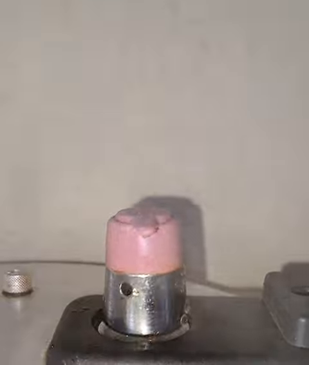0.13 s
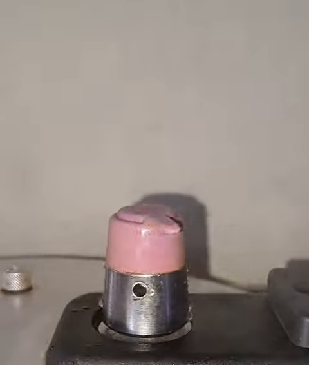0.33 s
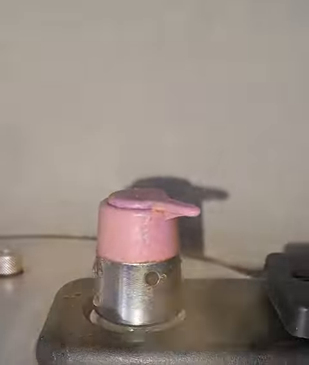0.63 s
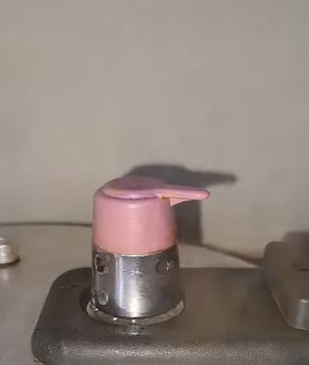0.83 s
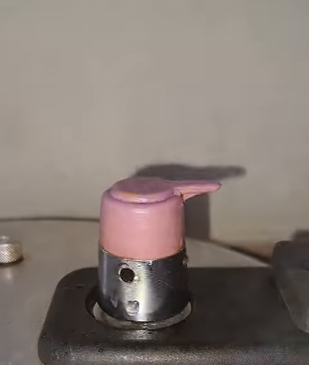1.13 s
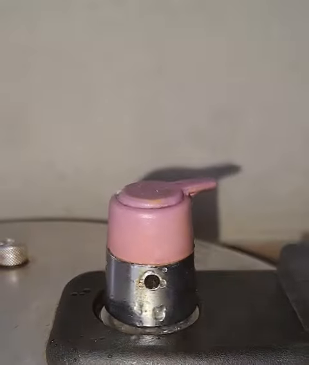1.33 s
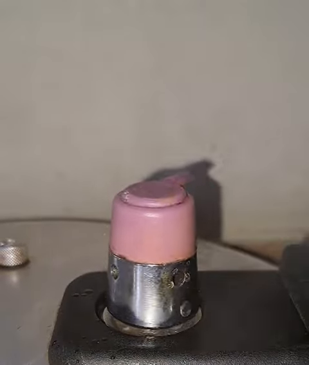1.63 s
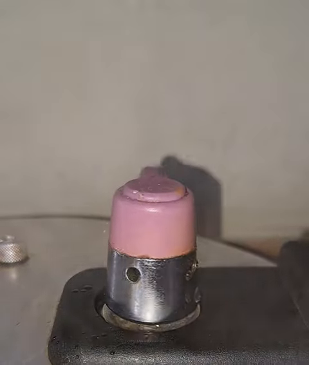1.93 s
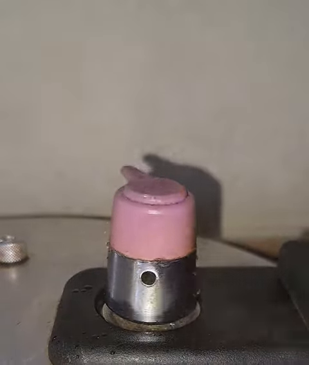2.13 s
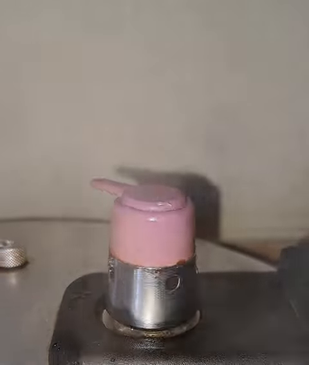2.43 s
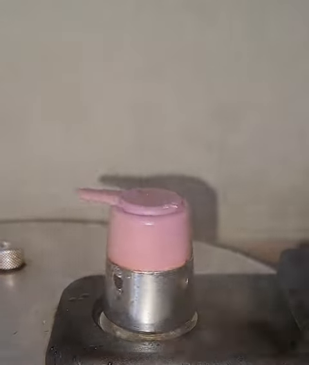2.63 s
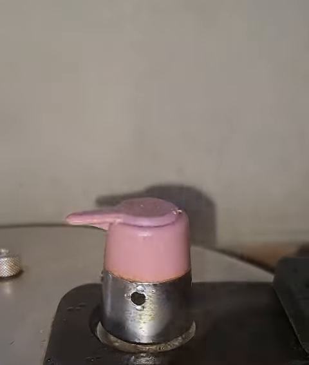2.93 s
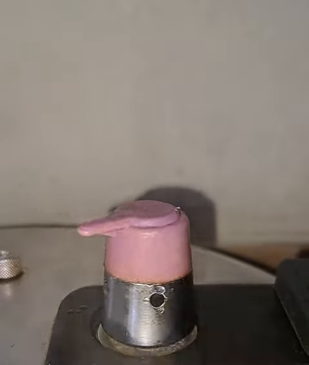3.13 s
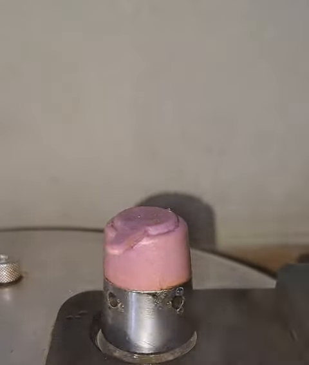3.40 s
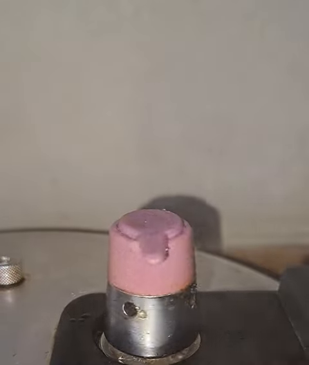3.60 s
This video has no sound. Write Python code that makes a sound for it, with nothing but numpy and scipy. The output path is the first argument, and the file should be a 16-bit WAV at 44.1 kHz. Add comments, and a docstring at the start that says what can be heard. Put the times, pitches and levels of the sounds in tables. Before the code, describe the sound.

Close stereo microphone on a turning pressure cooker weight in a kitchen: sharp steam hiss sputters with water spits and lumpy rumble, then dries into strong, fast chuffing pulses until the end.

```python
"""Steam hisses out of the slowly turning weight valve of a pressure cooker, close to a two-port microphone.
The weight jiggles on its seat about ten times a second: first a wet, sputtering flutter, then clear-cut puffs.
The jet is noise in three bands that follow a table of the valve flow.
Water drops spit in it as short damped sines, and steam buffets the ports as a lumpy low rumble."""
import sys
import numpy as np
from scipy import signal
from scipy.fft import rfft, irfft, next_fast_len
from scipy.io import wavfile
from scipy.ndimage import uniform_filter1d, map_coordinates

SR = 44100
rng = np.random.default_rng(int(sys.argv[2]) if len(sys.argv) > 2 else 0)


def put_to_file(sound):
    """Save the sound as 16-bit audio at rate SR, in the file named by the first command-line argument."""
    columns = np.atleast_2d(sound).T  # one column per channel
    safe = np.clip(columns, -1, 1)
    whole_steps = np.round(safe * 32767)
    wavfile.write(sys.argv[1], SR, whole_steps.astype(np.int16))


N = 165816
T = np.arange(N) / SR  # seconds

START_S = 0.1095  # silence before this
# when the wet sputter starts turning into puffs, and when it has turned: start_s, end_s
CHANGE_S = (1.8, 2.5)
RIGHT_LAG_S = .00016  # the right port hears later by this basic lag


def amp(db):
    """dB to gain."""
    return 10 ** (np.asarray(db) / 20)


def unit(x):
    """Scale to rms 1."""
    return x / np.sqrt(np.mean(x ** 2) + 1e-20)


def along(points, hz):
    """Each column of (Hz, value, ..) rows, read at hz on a log axis."""
    f, *cols = np.transpose(points)
    return np.array([np.interp(np.log(hz + 1), np.log(f + 1), c) for c in cols])


def curves(rows):
    """One value per sample for each column after the time."""
    s, *cols = np.transpose(rows)
    return [np.interp(T, s, c) for c in cols]


def wobble(rate):
    """A smooth random curve, rate knots a second."""
    knots = rng.standard_normal(int(N * rate / SR) + 4)
    return map_coordinates(knots, [T * rate])


def filtered(x, response):
    """x times a response of frequency."""
    m = next_fast_len(N + SR // 2)
    return irfft(rfft(x, m) * response(np.fft.rfftfreq(m, 1 / SR)), m)[..., :N]


def ports(depth_db):
    """Noise with patches of random gain at two ports; the right hears later, and the
    path difference drifts from band to band as the holes turn."""
    # how the ports relate: pitch_hz, likeness (0-1),
    # extra lag of the right port while sputtering: wet_lag_rad, and while puffing: puff_lag_rad
    likeness = [(40, 0.6, 0.13, 0.092), (130, 0.96, 0.37, 0.68), (825, 0.39, -0.42, -0.72),
                (1610, 0.98, 0.71, 0.63), (2440, 0.72, -0.7, -0.64), (3110, 0.38, 0.41, -0.73),
                (3890, 1, 0.46, -0.95), (4580, 0.04, 0.42, 1), (5400, 0.11, 1, 0.85),
                (8400, 0.8, -0.31, -1.26), (11100, 1, -0.79, 1), (15000, 0.2, -0.3, -0.67)]
    drift_rad = 2.5  # rms wander of the phase from 10 kHz up, less below
    hz, s, z = signal.stft(rng.standard_normal((2, N)), SR, nperseg=512)

    def patches(bins, frames):
        """Random values smoothed over frequency bins and time frames, rms 1."""
        grid = uniform_filter1d(rng.standard_normal(z.shape[1:]), size=bins, axis=0)
        return unit(uniform_filter1d(grid, size=frames, axis=1))

    alike, wet_lag, puff_lag = along(likeness, hz)[..., None]
    # shared noise plus opposed noise sets how alike the ports are
    turn = np.arccos(np.clip(alike, 0, 1)) / 2
    mid, side = z[0] * np.cos(turn), z[1] * np.sin(turn)
    puffing = np.interp(s, CHANGE_S, [0, 1])
    phase = 2 * np.pi * hz[:, None] * RIGHT_LAG_S + wet_lag + (puff_lag - wet_lag) * puffing
    phase = phase + drift_rad * np.clip(hz[:, None] / 1e4, 0, 1) ** 2 * patches(12, 150)
    gain = amp(depth_db * patches(4, 12) + 1.86 * patches(1, 30))
    pair = np.array([mid + side, (mid - side) * np.exp(-1j * phase)]) * gain
    return unit(signal.istft(pair, nperseg=512)[1][:, :N])


def buffet():
    """Lumpy low rumble of steam blowing past the ports, a little stronger at the left one."""
    # course of the rumble, before a fixed lift: start_s, level_db
    rumble_level = [(.11, -61), (.2, -57), (.35, -60.5), (.65, -58), (.8, -62), (.97, -57), (1.1, -66),
                    (1.23, -57), (1.36, -59), (1.6, -58), (1.71, -49.5), (1.9, -66.5), (2.0, -51),
                    (2.08, -82), (2.55, -80), (2.64, -66), (2.72, -87), (2.84, -73), (2.95, -84),
                    (3.1, -63), (3.22, -74), (3.76, -70)]
    # relative spectrum of the rumble, before a low-pass at 230 Hz: pitch_hz, level_db (per Hz)
    rumble_colour = [(25, -23), (48, -2.5), (81, -7), (130, 2), (220, -2), (290, -28), (480, -120)]
    level_db, = curves(rumble_level)
    rumble = filtered(ports(depth_db=0.0),
                      lambda hz: amp(along(rumble_colour, hz)) / (1 + (hz / 230) ** 6))
    # lumps common to both ports, and lumps of each port's own
    lumps_db = 5 * wobble(22) + 3 * np.array([wobble(14), wobble(14)])
    lumps = amp(np.minimum(lumps_db, 7))
    return unit(rumble * lumps) * amp(level_db + 3.7) * amp([[.8], [-.8]])  # left and right trim in dB


def drops():
    """Water drops bursting in the jet: short damped blips, mostly while it sputters."""
    # the drops that spit loudest, before a lift of 1 dB and the port gains: start_s, level_db, pitch_hz
    loud_spits = [(0.181, -7.5, 2650), (0.586, -12, 2340), (0.717, -13, 2640), (1.111, -8.5, 2550),
                  (1.206, -18.5, 1330), (1.577, -14.5, 2240), (1.793, -15.5, 2100)]
    drop_density = 130  # scaled by the end of the change; about 177 small drops a second
    middle_hz, faintest_db = 1870, -40  # small drops, level before the port gains
    drop_cycles = 7  # cycles in which a blip decays by 30 dB
    count = int(drop_density * CHANGE_S[1])
    draw = rng.random((count, 3))
    small_s = START_S + draw[:, 0] * (CHANGE_S[0] + .15 - START_S)
    small_db = faintest_db + 8 * draw[:, 1] ** 2
    small_hz = middle_hz * 2 ** (2.6 * (draw[:, 2] - .5))  # 2.6 octaves wide
    small = np.c_[small_s, small_db, small_hz]
    s, db, hz = np.vstack([small, np.array(loud_spits) + [0, 1, 0]]).T[..., None]
    k = np.arange(400)  # samples in a blip
    cycles = hz * k / SR
    envelope = amp(db - 30 * cycles / drop_cycles) * (1 - np.exp(-2 * cycles))
    blips = envelope * np.sin(2 * np.pi * cycles)
    places = np.round(s * SR).astype(int) + k
    x = np.bincount(places.ravel(), blips.ravel(), N + 400)[:N]
    return np.array([x * amp(-1.0), np.roll(x, round(RIGHT_LAG_S * SR)) * amp(0.5)])


def jet():
    """Turbulent steam through the holes of the weight, in three bands that follow the flow."""
    # valve flow, before the band trims: start_s, level_db, treble_db (over that level)
    flow = [(0.118, -30, 5.5), (0.158, -32, 6.5), (0.188, -25.5, 9.5), (0.208, -30, 6.5), (0.281, -29, 7),
            (0.393, -33.5, 6), (0.433, -28, 8.5), (0.467, -32.5, 4.5), (0.503, -27.5, 9), (0.563, -32, 4),
            (0.591, -23.5, 6.5), (0.631, -31, 2), (0.662, -27, 7.5), (0.736, -30.5, 4), (0.77, -26.5, 9.5),
            (0.806, -30.5, 3.5), (0.856, -26, 7.5), (0.898, -27.5, 4.5), (0.942, -26.5, 12), (0.97, -32, 2),
            (0.988, -27.5, 11), (1.05, -29, 9), (1.074, -31, 5), (1.111, -25, 8), (1.147, -28.5, 4),
            (1.215, -24.5, 8.5), (1.233, -26.5, 3.5), (1.317, -28.5, 5.5), (1.345, -30, 2),
            (1.393, -26.5, 5.5), (1.453, -31, 3), (1.485, -25.5, 10), (1.519, -28.5, 2), (1.584, -26, 7),
            (1.616, -27, 1), (1.644, -25.5, 6), (1.664, -27.5, 2), (1.694, -26.5, 11), (1.71, -30, -1),
            (1.746, -28, 6.5), (1.868, -28, 4.5), (1.906, -27.5, 8), (1.95, -28.5, 1.5), (1.97, -26.5, 5.5),
            (2.057, -29.5, 1), (2.081, -28, 3), (2.215, -31.5, 1), (2.261, -27, 2.5), (2.307, -25.5, 0),
            (2.333, -31.5, 0), (2.373, -25.5, 0), (2.415, -26.5, -2.5), (2.451, -37, -2),
            (2.474, -26.5, 4.5), (2.505, -22, 0), (2.532, -33.5, -3), (2.56, -21.5, 4), (2.596, -20.5, 1),
            (2.624, -35, -0.5), (2.644, -25, 4.5), (2.666, -20.5, 2), (2.745, -34, -0.4), (2.776, -24, 5),
            (2.806, -22.5, 0.5), (2.832, -36.5, 3), (2.852, -25, 2.5), (2.885, -21, 3.5), (2.914, -24.5, 3),
            (2.932, -32.0, 2.5), (2.977, -23, 2), (3.051, -31, 3), (3.095, -25, 6), (3.137, -33, 1.5),
            (3.168, -23, 5.5), (3.233, -29.5, 2), (3.259, -25.5, 9.5), (3.299, -29.5, 5),
            (3.366, -30.5, 5.5), (3.44, -25, 4.5), (3.488, -35, 3), (3.522, -24, 7), (3.582, -31, 5),
            (3.646, -26, 9), (3.677, -37.5, 3), (3.714, -24.5, 6.5), (3.753, -32, 5)]
    # low band over the jet level, before the band trims: start_s, level_db
    low_over_jet = [(.1, -9), (.9, -10), (2.0, -9), (2.15, -16), (2.2, -11.5), (2.7, -12), (3, -9.5),
                    (3.76, -9)]
    # relative colour at the ports: pitch_hz, then while the jet sputters left_wet_db, right_wet_db,
    # and once it puffs left_puff_db, right_puff_db
    colour = [(200, -26, -27, -30.5, -31.5), (393, -26, -26, -28, -29), (700, -24, -26.5, -25, -29),
              (850, -21, -29.5, -22, -28), (1060, -25.5, -26.5, -25.5, -24.5),
              (1320, -18.5, -15.5, -24, -17.5), (1980, -20, -26.5, -18, -28.5),
              (2185, -15.5, -18, -21, -14.5), (2710, -17, -21, -19, -26), (3240, -21, -15.5, -20.5, -12.5),
              (3670, -14, -17.5, -17, -20.5), (4320, -16.5, -14.5, -20, -19.5),
              (4750, -17, -18, -33.5, -18.5), (5260, -13, -11.5, -16, -10), (5940, -17.5, -12, -18, -20.5),
              (6230, -13.5, -14.5, -24, -17.5), (6630, -16.5, -16.5, -19, -19), (7890, -9.5, -5, -16, -10),
              (8270, -13.5, -14.5, -16.5, -16.5), (8550, -17.5, -15, -21, -22.5),
              (9660, -15, -22, -18, -26), (10780, -13.5, -23.5, -13.5, -22), (11350, -10, -16, -13, -17.5),
              (13400, -8.5, -16, -9.5, -15.5), (14900, -10.5, -13, -11, -13),
              (16200, -13.5, -13.5, -12.5, -14.5)]
    low_hz, treble_hz = 2995, 10000  # where the three bands meet
    wet_db, puff_db = 1, 0.59  # scale of the fast sputter before and after the change
    bass_swing, right_swing = 0.78, 0.56  # share of the flutter in the low band, and in the right treble
    snap = 0.36  # 0-1; the weight lifts and seats fast, so the flow lingers at each level and jumps between

    s, level_db, treble_db = np.transpose(flow)
    row = np.arange(len(s))
    place = np.interp(T, s, row)
    place = place - np.clip(snap, 0, 1) * np.sin(2 * np.pi * place) / (2 * np.pi)
    level_db, treble_db = np.interp(place, row, level_db), np.interp(place, row, treble_db)
    low_db, = curves(low_over_jet)

    puffing = np.interp(T, CHANGE_S, [0, 1])
    white = np.tile(ports(depth_db=1.5), (2, 1))  # one pair for each colour
    both = filtered(white, lambda hz: amp(along(colour, hz)))
    steam = (1 - puffing) * both[:2] + puffing * both[2:]
    low = filtered(steam, lambda hz: 1 / (1 + (hz / low_hz) ** 8))
    treble = filtered(steam, lambda hz: 1 / (1 + (treble_hz / (hz + 1)) ** 16))
    middle = steam - low - treble

    sputter_db = wet_db * (1 - puffing) + puff_db * puffing
    shared, out = wobble(260), 0
    # band, dB over the jet level, share of the flutter, sputter of its own
    bands = ((low, low_db, bass_swing, 1.2),
             (middle, -.4, 1, .7),
             (treble, treble_db - .3, np.array([[1], [right_swing]]), .8))
    for band, db, swing, own in bands:
        slow_db = uniform_filter1d(level_db + db, size=SR // 4) + 0.5
        band_db = slow_db + swing * (level_db + db - slow_db)
        power = uniform_filter1d(np.mean(band ** 2, axis=0), size=SR // 2)
        level = band / np.sqrt(np.abs(power))
        out = out + level * amp(band_db + sputter_db * (shared + own * wobble(150)))
    return filtered(out, lambda hz: 1 / (1 + (135 / (hz + 1)) ** 6))  # high-pass at 135 Hz


def scene():
    """Rumble, drops and jet at the microphone; after a short silence the sound cuts in over 5.2 ms."""
    return (jet() + drops() + buffet()) * np.clip((T - START_S) / 0.0052, 0, 1)


def record(dry):
    """Nothing is kept above the band limit, which closes over 60 Hz."""
    top_hz = 15740
    return filtered(dry, lambda hz: np.clip((top_hz + 30 - hz) / 60, 0, 1))


dry = scene()
out = record(dry)
put_to_file(out)
```